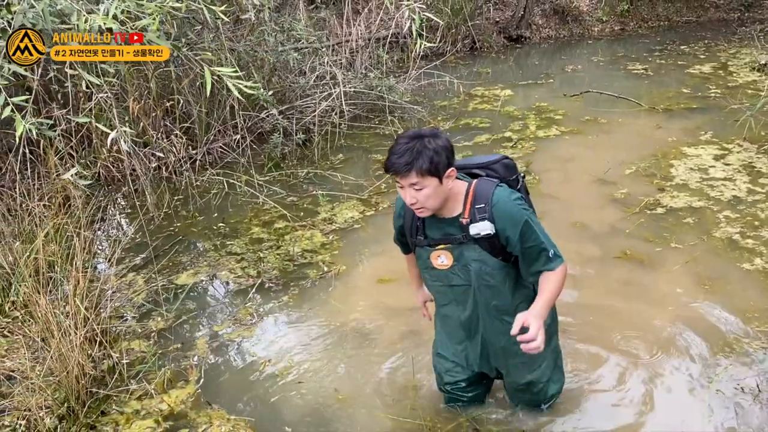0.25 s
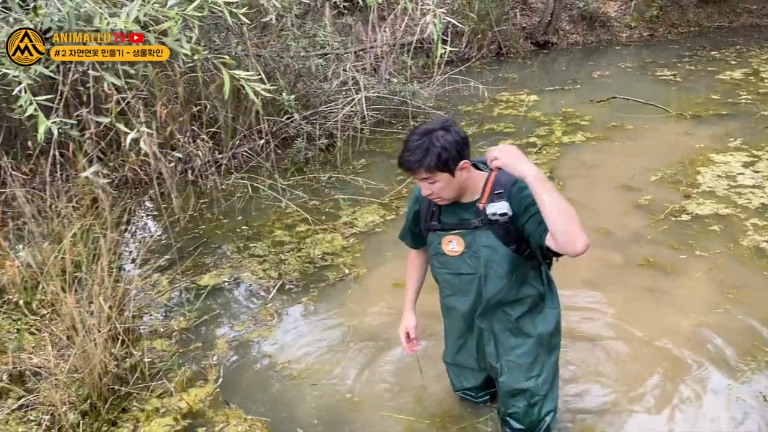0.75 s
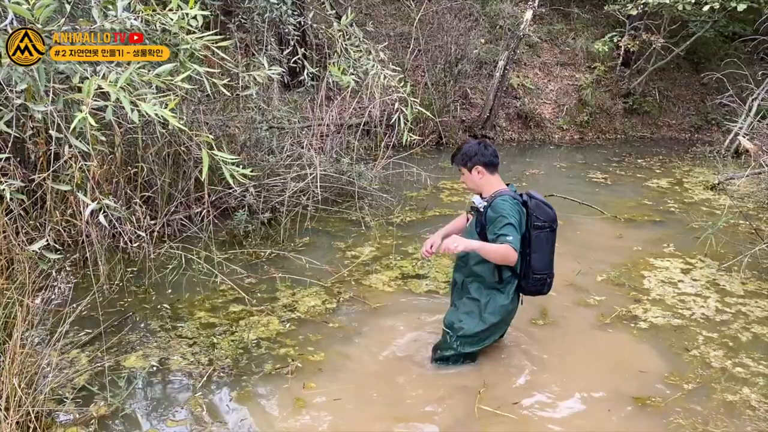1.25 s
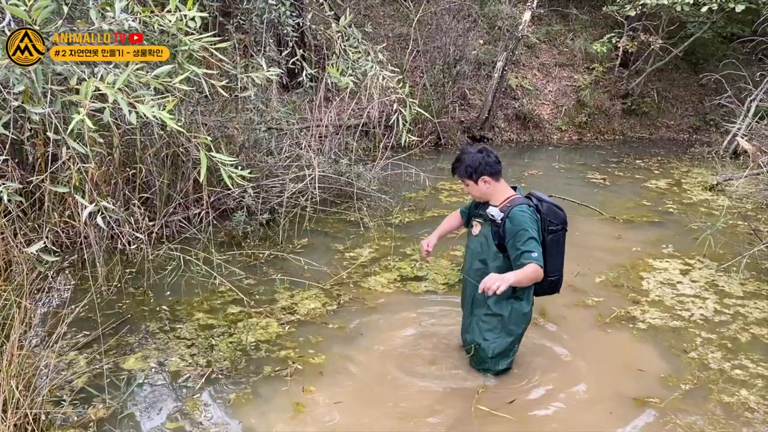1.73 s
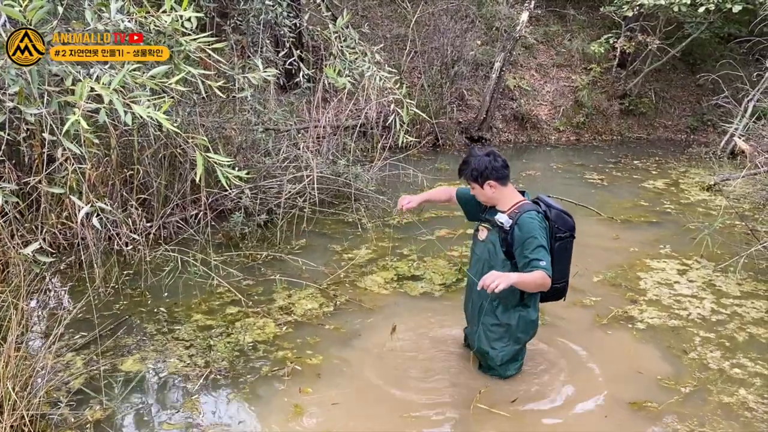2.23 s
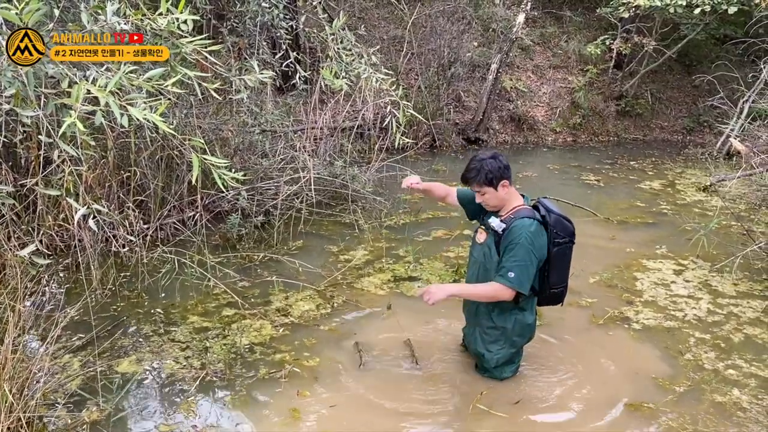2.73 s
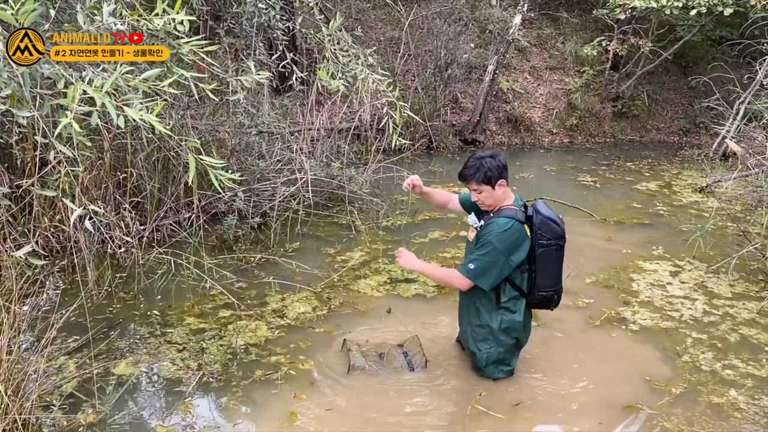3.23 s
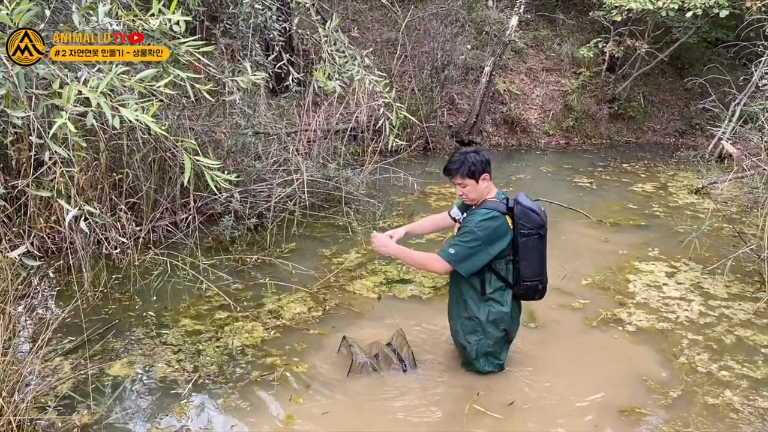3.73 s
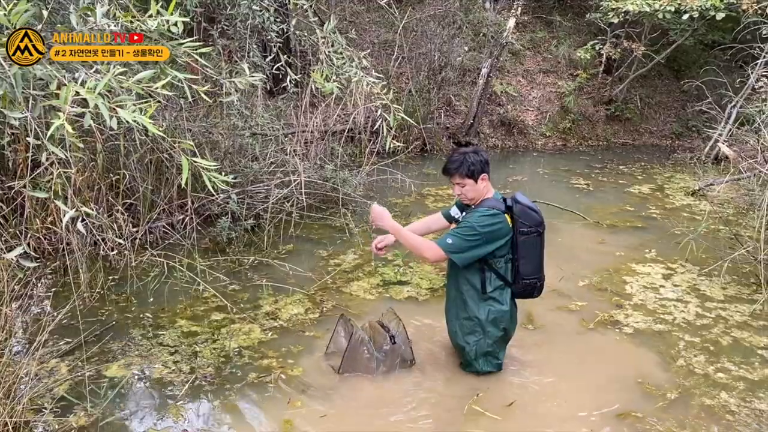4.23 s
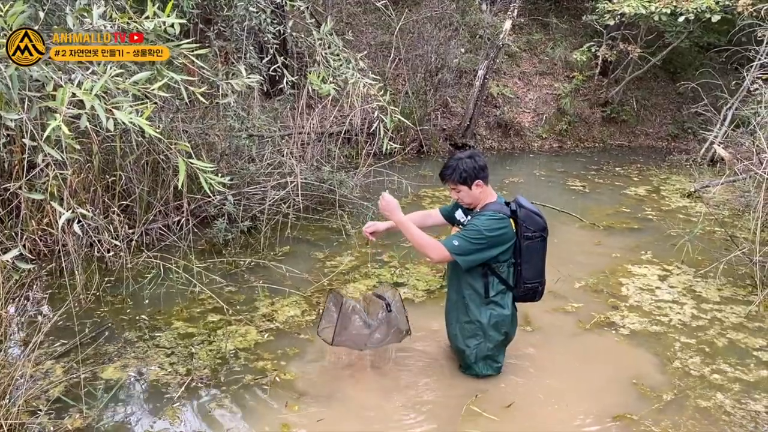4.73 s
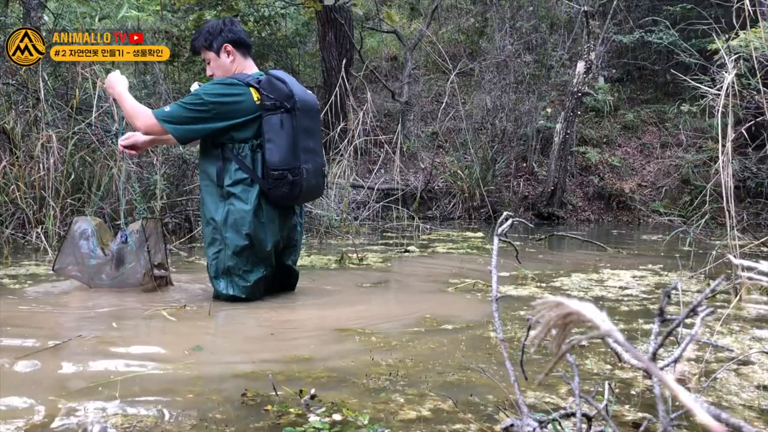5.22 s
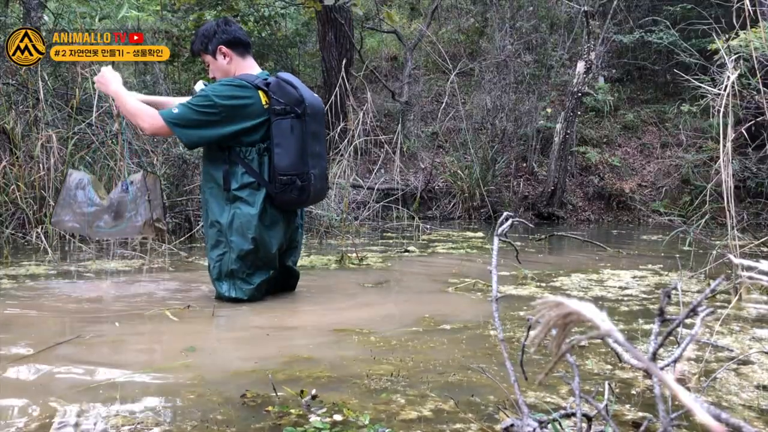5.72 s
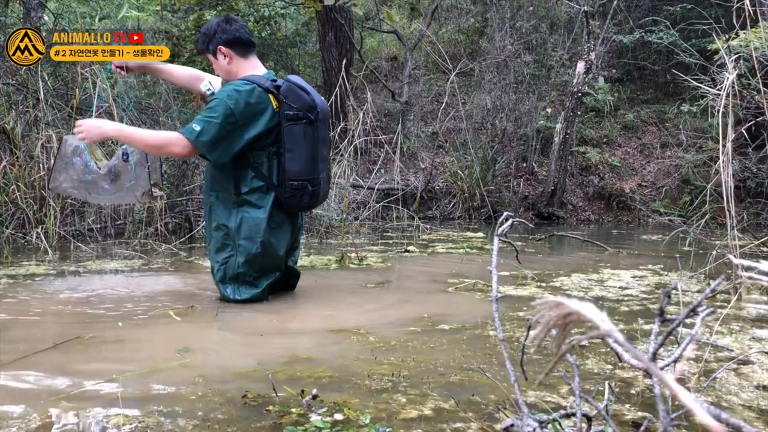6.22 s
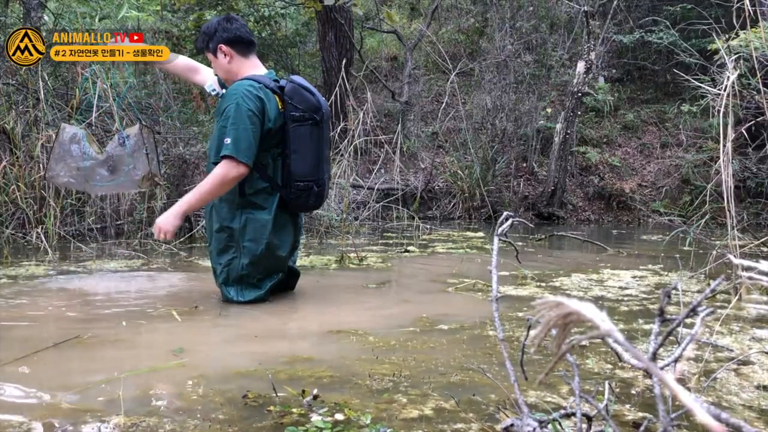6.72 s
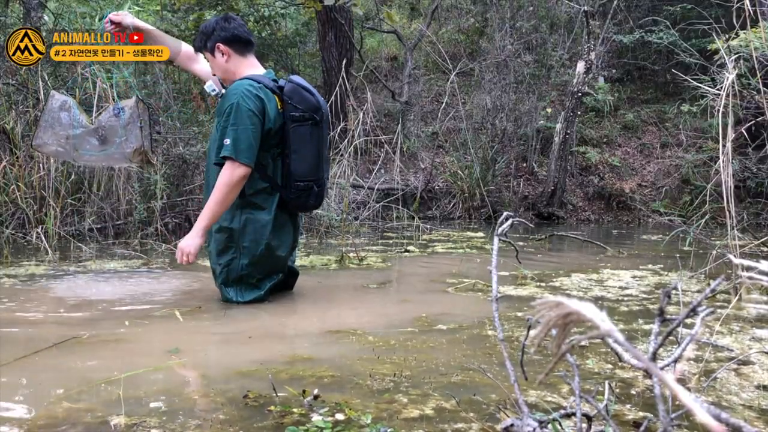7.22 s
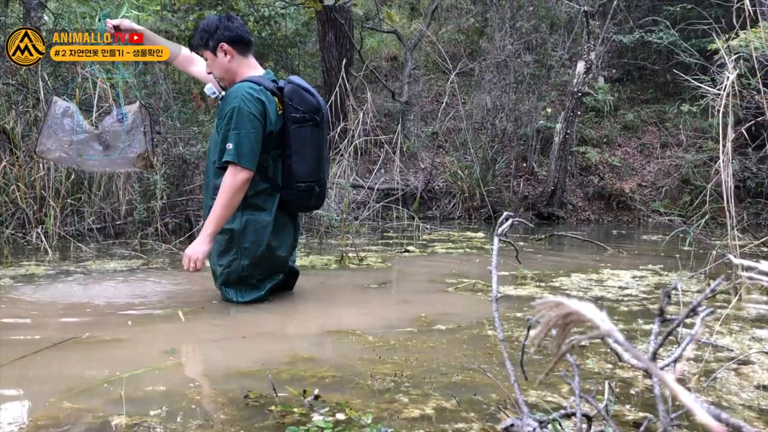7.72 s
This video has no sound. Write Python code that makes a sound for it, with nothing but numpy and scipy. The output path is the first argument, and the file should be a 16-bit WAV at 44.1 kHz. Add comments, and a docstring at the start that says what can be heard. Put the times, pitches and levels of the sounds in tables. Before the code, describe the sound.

Legs slosh through a calm pond, then a mesh trap hisses up out of the water and drains in bubbly trickles and drips while crickets trill.

```python
"""Pond water sloshes around wading legs, then a mesh trap breaks the surface with a hiss, is lifted and drains.
Moving water is lumpy noise with swarms of small bubbles; larger bubbles tick and ring, many rising in pitch.
Drops splat as short noise bursts; crickets trill and chirp on the banks as pulsed noise and tone.
A far rumble lies beneath; two ports in a small camera body hear it all with a frequency-dependent lag."""
import sys
import numpy as np
from scipy import signal
from scipy.fft import rfft, irfft, next_fast_len
from scipy.io import wavfile
from scipy.ndimage import map_coordinates

SR = 44100
rng = np.random.default_rng(int(sys.argv[2]) if len(sys.argv) > 2 else 0)


def log_audio(samples):
    """Write samples as a 16-bit WAV file to the path given in sys.argv[1]."""
    # one column per channel
    frames = np.atleast_2d(samples).T
    # limit to full scale, then quantise
    limited = np.clip(frames, -1, 1)
    pcm = np.round(limited * 32767).astype(np.int16)
    wavfile.write(sys.argv[1], SR, pcm)


N = 351036
T = np.arange(N) / SR  # s
AHEAD_UNTIL_S, WADING_UNTIL_S = 0.9, 2.5


def amp(db):
    """Gain of a level in dB."""
    return 10 ** (np.asarray(db) / 20)


def unit(x):
    """x at rms 1."""
    return x / np.sqrt(np.mean(x ** 2) + 1e-20)


def curve(rows):
    """Straight lines through (time, value) rows, one value per sample."""
    s, value = np.transpose(rows)
    return np.interp(T, s, value)


def wobble(rate):
    """A smooth random curve, rate knots a second."""
    knots = rng.standard_normal(int(N * rate / SR) + 4)
    return map_coordinates(knots, [T * rate])


def filtered(x, response):
    """x times a complex response of frequency."""
    m = next_fast_len(N + SR // 4)
    return irfft(rfft(x, m) * response(np.fft.rfftfreq(m, 1 / SR)), m)[..., :N]


def colour(points):
    """Gain read from (Hz, dB) points on a log frequency axis."""
    f, db = np.transpose(points)
    return lambda hz: amp(np.interp(np.log(hz + 1), np.log(f), db, -120, db[-1]))


def resonance(centre_hz, width_hz):
    """One causal resonance, a band-pass with gain 1 at its centre."""
    return lambda f: 1j * f * width_hz / (centre_hz ** 2 - f * f + 1j * f * width_hz)


def pair(spectrum, alike):
    """Two coloured noises of rms 1 that are partly alike, left and right."""
    turn = np.arccos(np.clip(alike, 0, 1)) / 2
    noise = filtered(rng.standard_normal((2, N)), colour(spectrum))
    shared, unlike = noise * [[np.cos(turn)], [np.sin(turn)]]
    return unit(np.array([shared + unlike, shared - unlike]))


def rings(s, hz, rise, life, db, size):
    """Bubble rings: sines that start sharply and glide up ever faster; fast risers swell before they burst."""
    s, hz, rise, life, db = (np.asarray(v, float)[:, None] for v in (s, hz, rise, life, db))
    u = np.arange(size) / SR / life  # age in lives
    octaves_up = rise * np.minimum(u, 1.2) ** 2.43
    phase = 2 * np.pi * np.cumsum(hz * 2 ** octaves_up, 1) / SR
    crest = np.clip(0.033 + 1.15 * rise, 0.05, 0.8)  # age at which the ring is loudest
    before_db = 2.5 * (1 - u / crest).clip(0)
    after_db = 8.4 * ((u - crest) / (1 - crest)).clip(0) ** 0.94 + 11 * (u - 1).clip(0)
    onset = (1 - np.exp(-u * life / 0.0007)) ** 2
    wave = amp(db - before_db - after_db) * onset * np.sin(phase)
    at = np.round(s * SR).astype(int) + np.arange(size)
    return np.bincount(at.ravel(), wave.ravel(), N + size)[:N]


def swarm(count, centre_hz, spread, cycles, rise, tail_db, size):
    """Countless small random bubbles at rms 1 overall, some louder than the rest."""
    when, big, glide, last = rng.random((count, 4)).T
    hz = np.clip(centre_hz * np.exp(spread * rng.standard_normal(count)), 320, 15000)
    db = np.minimum(-tail_db * np.log(big), 2 * tail_db)
    life = cycles * (0.26 + last) / hz
    return unit(rings(when * N / SR, hz, rise * glide, life, db, size))


def surge_db(start, crest, end, db, swell_db, sag_db):
    """Level of one push of water: a sudden start, a swell to the crest, a sag, then quick settling."""
    outside_db = 1500 * (start - T).clip(0) + 264 * (T - end).clip(0)  # slopes in dB/s
    return db - swell_db * (crest - T).clip(0) - sag_db * (T - crest).clip(0) - outside_db


def stirring():
    """Gains of slosh and seethe: calm pond, surges of pushed water and draining add up."""
    # Pushed water, from the legs and then the rising trap:
    # start/s, crest/s, end/s, slosh level at crest/dB, seethe level at crest/dB
    surges = [(0, -0.004, 0.29, -27, -32.5), (0.3, 0.472, 0.6, -42.5, -49), (0.56, 0.76, 0.88, -82, -56.5),
              (0.908, 1.252, 1.34, -52, -49.5), (1.41, 1.5, 1.494, -52, -53.5),
              (1.53, 1.784, 1.862, -44.5, -52.5), (3.572, 3.622, 4, -64, -90),
              (4.496, 4.945, 5.2, -49, -60)]
    # Water running out of the mesh: t/s, seethe level/dB
    drain = [(3.4, -82), (3.85, -69.5), (4.4, -58), (4.56, -51), (4.7, -51), (4.92, -50), (5.12, -55),
             (5.25, -48.5), (5.38, -47.5), (5.5, -47), (5.82, -50), (6, -42.5), (6.15, -47.5), (6.4, -49),
             (6.62, -52), (6.75, -53.5), (6.97, -48.5), (7.03, -54.5), (7.13, -46), (7.25, -58),
             (7.45, -53.5), (7.8, -58), (7.96, -49.5)]
    calm_db, drain_slosh_db = -70.5, -21  # lapping at rest; gurgle relative to the draining seethe
    drain_db = curve(drain)
    thinning_db = 2.5 * (T - drain[0][0]).clip(0)  # the gurgle lessens as the stream thins to drips
    slosh = amp(calm_db - thinning_db) + amp(drain_db + drain_slosh_db - thinning_db)
    seethe = amp(drain_db)
    for start, crest, end, slosh_db, seethe_db in surges:
        slosh = slosh + amp(surge_db(start, crest, end, slosh_db, swell_db=42, sag_db=72))  # dB/s
        seethe = seethe + amp(surge_db(start, crest, end, seethe_db, swell_db=5, sag_db=52))
    return slosh, seethe


def stirred():
    """Moving water traps air: gurgles below, plinks, fizz, patter and crackle above, on lumpy noise."""
    # Noise of pushed water: f/Hz, level per Hz/dB
    slosh_colour = [(120, -1), (300, 2), (700, 3.5), (1200, 4), (2500, -25)]
    # Noise of seething water: f/Hz, level per Hz/dB
    seethe_colour = [(500, -7.5), (1100, -10), (2000, -5), (4000, 2.5), (7000, -5), (11000, -4),
                     (16000, -9.5)]
    slosh, seethe = stirring()
    gurgle = swarm(count=2400, centre_hz=628, spread=0.473, cycles=9.04, rise=0.31, tail_db=3, size=1500)
    plink = swarm(count=2600, centre_hz=1300, spread=0.4, cycles=20, rise=0.5, tail_db=1.5, size=1300)
    fizz = swarm(count=7000, centre_hz=2300, spread=0.45, cycles=12, rise=0.3, tail_db=2.5, size=400)
    patter = swarm(count=500, centre_hz=3660, spread=0.508, cycles=5.3, rise=0.2, tail_db=3, size=200)
    crackle = swarm(count=4000, centre_hz=8300, spread=0.413, cycles=4.4, rise=0.044, tail_db=1.5, size=48)
    # The full stream traps many clear pockets, and its spray is brighter
    plink = plink * np.interp(T, [3.7, 4.4, 6.4, 6.8], [0.15, 1.3, 1.3, 0.45])
    crackle = crackle * np.clip(T - 3.4, 0.55, 1)
    lumps = wobble(10)  # shared by slosh and seethe
    low = amp(-8.5) * gurgle + amp(-7.5) * pair(slosh_colour, alike=0.66)
    high = amp(-8) * plink + amp(-4.5) * fizz + amp(-5) * patter + amp(-4.5) * crackle
    high = high + amp(-3.5) * pair(seethe_colour, alike=0.85)
    return slosh * amp(3.1 * lumps) * low + seethe * amp(1.5 * lumps + 3 * wobble(30)) * high


def rumble():
    """Far rumble: low coloured noise whose level drifts slowly."""
    # Rumble colour: f/Hz, level/dB
    air = [(25, -34), (40, -7.5), (60, -1.5), (110, -6.5), (250, -9.5), (420, -14), (650, -22), (1500, -28),
           (3300, -31.5)]
    # Rumble loudness: t/s, level/dB
    loudness = [(0, -58.5), (.7, -65.5), (1.2, -59.5), (3, -62), (4.7, -59.5), (5.8, -63), (6.5, -66),
                (7.7, -66), (7.85, -62)]
    return amp(curve(loudness) + 1.4 * wobble(4.1)) * pair(air, alike=0.7)


def strokes(rate, sharp):
    """Wing strokes: a gate that opens about rate times a second, slightly unsteady."""
    phase = 2 * np.pi * np.cumsum(rate + 0.36 * wobble(1.85)) / SR
    return (0.5 + 0.5 * np.sin(phase)) ** sharp


def singer(gate, centre_hz, width_hz, blur):
    """Gated noise, as of file teeth, shakes a wing resonance; leaves scatter it unlike to each port."""
    noise = rng.standard_normal(N) + blur * rng.standard_normal((2, N))
    wing = resonance(centre_hz, width_hz)
    return unit(filtered(noise * gate, lambda f: wing(f) ** 2))


def sung(start, end):
    """A gate with soft edges."""
    edge_s = 0.032
    return np.clip(np.minimum(T - start, end - T) / edge_s + 0.5, 0, 1)


def far_chorus():
    """Far insects blend into steady coloured noise that wavers a little."""
    # Blend of many far singers: f/Hz, level/dB
    chorus = [(3300, -27), (4100, -16), (5300, -2), (7500, -6.5), (8400, -3), (9300, -17), (11000, -22),
              (11900, -40), (12800, -7), (14700, -10), (15600, -53)]
    return amp(-58 + 1.2 * wobble(3) + 0.8 * wobble(12)) * pair(chorus, alike=0.7)


def thin_trill():
    """An unbroken narrow trill of wing strokes through a sharp resonance."""
    gate = 0.3 + strokes(32.5, sharp=1.5)
    return amp(-68 + 1.5 * wobble(5)) * singer(gate, 5970, 130, blur=0.8)


def low_trill():
    """The low singer: bouts of even bursts over a constant murmur, stroked at two rates an octave apart."""
    # Bouts: first burst t/s, number of bursts, level/dB
    bouts = [(2.41, 4, -59), (4.54, 3, -58), (6.85, 3, -56.5)]
    every_s, burst_s, murmur_db = 0.33, 0.15, -63
    gain = amp(murmur_db)
    for first, count, db in bouts:
        for k in range(round(count)):
            start = first + k * every_s
            gain = gain + amp(db) * sung(start, start + burst_s)
    gate = 0.5 + strokes(64.8, sharp=1.2) * (1.2 + strokes(32.4, sharp=1.2))
    return gain * singer(gate, 4330, 480, blur=1.3)


def high_trill():
    """The high singer: fast strokes in long phrases that grow louder toward their ends."""
    # Phrases: start/s, end/s, final level/dB
    phrases = [(1.05, 2.41, -58.5), (2.95, 3.306, -60.5), (3.575, 4.167, -60.5), (4.8, 6.296, -63),
               (6.4, 7.96, -55.5)]
    grows_db = 3
    gain = 0
    for start, end, db in phrases:
        remaining = np.clip((end - T) / (end - start), 0, 1)
        gain = gain + amp(db - grows_db * remaining ** 2) * sung(start, end)
    return gain * singer(0.2 + strokes(81.8, sharp=2.5), 6520, 620, blur=1.3)


def chirper():
    """One cricket calls in chirps of about four strokes, a wavering tone mixed with wing noise."""
    # Chirps: t/s, level/dB
    chirp_times = [(1.788, -47.5), (1.965, -47.5), (2.129, -49), (2.304, -48.5), (2.488, -47.5),
                   (2.675, -51), (3.02, -55), (3.15, -51), (4.073, -53), (4.249, -53), (4.426, -53),
                   (4.6, -52), (4.78, -53), (4.955, -53)]
    calls, t = np.zeros(N + SR), np.arange(SR // 12) / SR
    pulses = 0.15 + np.sin(np.pi * 60 * t) ** 2  # 60 strokes a second
    arch = np.sin(np.pi * (t / 0.068).clip(0, 1)) ** 0.6
    for s, db in chirp_times:
        calls[round(s * SR):][:len(t)] += amp(db) * pulses * arch
    tone = np.sin(2 * np.pi * np.cumsum(5100 + 40 * wobble(8)) / SR)
    return calls[:N] * (amp(-1) * tone + amp(-5) * singer(1, 4900, 600, blur=0.8))


def crickets():
    """A far chorus and a thin trill around; two trills and the chirper louder on the left."""
    left_right = amp([[1.5], [-1.5]])
    return far_chorus() + thin_trill() + (low_trill() + high_trill() + chirper()) * left_right


def bubbles():
    """Each pocket of air is born with a wet tick and rings, often upward as it nears the surface."""
    # Trapped air that stands out: t/s, start pitch f/Hz, pitch rise/octaves, life/s, level/dB
    pockets = [(0.02, 313.5, 0.29, 0.021, -22), (0.05, 660, 0.058, 0.0063, -27),
               (0.068, 1180, 0.0099, 0.0065, -26.5), (0.074, 3420, 0.066, 0.0028, -20),
               (0.084, 957, 0.58, 0.017, -36), (0.098, 1655, 0.59, 0.012, -34),
               (0.105, 517, 0.05, .006, -32), (0.124, 1285, 0.21, 0.009, -31),
               (0.16, 530, 0.21, 0.014, -31), (0.175, 560, 0.051, 0.0063, -24.5),
               (0.182, 2270, 0.05, 0.0052, -39), (0.214, 1490, 0.067, 0.0056, -30.5),
               (0.259, 1960, 0.16, 0.0098, -33), (0.299, 330, 0.39, 0.0087, -41.5),
               (0.318, 810, 0, 0.0054, -38), (0.365, 1130, 0.05, 0.014, -34),
               (0.399, 1076, 0.05, 0.012, -33), (0.417, 440, 0.53, 0.0023, -29),
               (0.439, 1360, 0.18, 0.0041, -26), (0.438, 1900, 0.12, 0.0023, -22),
               (0.449, 552, 0.18, 0.063, -46), (0.572, 170, 0, 0.008, -46), (0.611, 600, 0.1, 0.004, -47),
               (0.616, 160, 0, 0.01, -45), (0.912, 830, 0.013, 0.0038, -37.5),
               (0.99, 700, 0.36, 0.0095, -43.5), (1.074, 874, 0.38, 0.01, -32.5),
               (1.104, 720, .6, 0.034, -39.5), (1.106, 1910, 0.27, 0.0072, -22),
               (1.123, 1440, 0.16, 0.0062, -34), (1.137, 2870, 0.2, 0.0046, -35),
               (1.152, 1980, 0.18, .008, -37), (1.154, 906, 0.55, 0.048, -40),
               (1.196, 1645, 0.35, 0.011, -29.5), (1.212, 780, 0.1, 0.02, -43),
               (1.245, 2490, 0.05, 0.0031, -33), (1.263, 1780, 0.11, 0.0071, -31.5),
               (1.31, 1660, 0, 0.0028, -37), (1.472, 1660, .011, 0.0028, -24),
               (1.487, 2770, 0.27, .005, -37), (1.499, 2200, 0.05, .004, -34),
               (1.549, 1880, 0.12, 0.0028, -27), (1.585, 590, 1.6, 0.018, -43),
               (1.611, 1510, 0.39, 0.018, -42.5), (1.631, 1050, 0.29, 0.0093, -43),
               (1.682, 1635, 0.34, 0.02, -41), (1.722, 884, 0.17, 0.024, -33.5),
               (1.742, 556, 0.16, 0.013, -34.5), (1.756, 1500, 0.11, 0.01, -33.5),
               (1.793, 1070, .01, 0.0097, -42), (1.799, 474, 0, 0.0057, -29.5),
               (1.818, 1090, 0, 0.0094, -40.5), (2.645, 794, 0.15, 0.0035, -44.5),
               (2.86, 430, 0.05, 0.03, -56), (3.561, 408, 0.081, 0.15, -59.5),
               (3.828, 1364, 0.12, 0.0069, -42), (3.943, 1720, .041, 0.012, -48.5),
               (4.148, 1800, 0.049, 0.013, -45.5), (4.194, 740, 0.69, .053, -52),
               (4.244, 1645, 0.31, 0.018, -48.5), (4.333, 1330, 0.1, 0.011, -44.5),
               (4.334, 1900, 0.12, 0.011, -45), (4.418, 1000, 0.25, 0.016, -40),
               (4.493, 2460, 0.11, 0.0044, -33.5), (4.537, 842, 0.13, 0.026, -35),
               (4.564, 2620, 0.061, 0.0065, -29.5), (4.611, 1040, 0, 0.016, -41),
               (4.633, 1750, 0, 0.0082, -34), (4.728, 800, 0.1, 0.026, -46),
               (4.733, 1940, 0.41, 0.016, -44), (4.752, 850, 0.11, 0.072, -43.5),
               (4.774, 1786, 0.12, 0.0079, -33.5), (4.793, 990, 0.15, 0.015, -32.5),
               (4.809, 792, 0.38, 0.032, -38.5), (4.852, 604, 0.032, 0.028, -36.5),
               (4.865, 1630, 0.026, 0.0091, -35), (4.892, 595, .12, 0.05, -36),
               (4.914, 2480, 0.05, 0.011, -39.5), (4.932, 1330, 0.03, 0.0098, -34),
               (4.941, 1575, 1.4, 0.015, -39.5), (4.964, 722, 0.49, 0.027, -32),
               (4.985, 3500, 0.38, 0.0032, -18), (5.036, 960, 0.043, 0.0033, -25.5),
               (5.05, 2380, 0, 0.0026, -22), (5.061, 1130, 0.12, 0.04, -46), (5.112, 1100, 0, 0.07, -50),
               (5.063, 812, 0.095, 0.043, -46.5), (5.15, 2720, 0.16, 0.0044, -22.5),
               (5.214, 1050, 0.2, 0.0075, -36), (5.253, 917, 0.093, 0.031, -32.5),
               (5.287, 1810, 0.22, 0.0042, -26.5), (5.312, 1550, 0, 0.013, -36),
               (5.329, 986, 0.075, 0.011, -32), (5.345, 825, 0.93, 0.029, -35), (5.39, 890, 0, 0.019, -40),
               (5.393, 1850, 0.61, 0.008, -34), (5.4, 1410, 0.56, .005, -32), (5.42, 1020, 0, 0.018, -36.5),
               (5.434, 1660, 0.1, .008, -38), (5.445, 783, .079, 0.0089, -31.5), (5.5, 800, 0, 0.02, -44),
               (5.537, 786, 0.58, 0.016, -40), (5.559, 1320, 2.1, 0.016, -35.5),
               (5.599, 1260, 0.26, 0.0041, -29), (5.621, 1230, 0.75, 0.032, -36.5),
               (5.697, 1570, 0.38, 0.0032, -25), (5.7, 590, 2.1, 0.088, -46.5),
               (5.74, 1440, 0.17, 0.0065, -28.5), (5.819, 960, 0.4, 0.029, -38.5),
               (5.845, 2300, 0.24, 0.0053, -34), (5.925, 984, 0.31, 0.026, -38.5),
               (5.932, 2760, 0.05, 0.0037, -28), (5.94, 769, 1, 0.037, -31.5),
               (5.963, 1900, 0.21, .012, -39), (5.973, 813, 0, 0.059, -42.5),
               (5.975, 1526, 0.93, 0.015, -34), (5.998, 1720, 0.4, .006, -35),
               (6.021, 1710, 1.6, 0.032, -38.5), (6.042, 689, 1.24, 0.036, -33),
               (6.068, 687, 0.5, 0.025, -40), (6.077, 1530, 0.6, 0.011, -30),
               (6.098, 1180, 0.18, 0.0062, -33), (6.147, 632, 0.85, 0.028, -35.5),
               (6.155, 1140, 0, 0.01, -34), (6.166, 920, 0.017, 0.024, -31),
               (6.211, 3330, 0.26, 0.0045, -29.5), (6.214, 859, 0.3, 0.024, -28.5),
               (6.258, 880, 1.2, 0.0074, -37), (6.279, 3080, 0.53, 0.0055, -26),
               (6.318, 768, 0, 0.037, -48.5), (6.377, 616, 0.95, 0.032, -39),
               (6.393, 3810, 0.36, .004, -25.5), (6.41, 992, 2, 0.039, -45.5),
               (6.444, 1000, .8, 0.031, -44), (6.521, 1030, 0.15, 0.0033, -32),
               (6.543, 1520, 0.05, 0.016, -45), (6.603, 3280, 0.081, .012, -39),
               (6.631, 4000, 0.3, 0.0045, -28.5), (6.682, 1660, 0.21, 0.0027, -30),
               (6.701, 1504, 1.1, 0.018, -37.5), (6.764, 1600, 0.9, 0.0066, -27),
               (6.816, 1410, 0.32, 0.015, -35.5), (6.845, 2200, 0.33, .008, -41),
               (6.87, 1720, 0.05, .007, -35), (6.877, 880, 0.44, 0.019, -42.5),
               (6.909, 1840, 0.02, 0.0081, -40), (6.926, 1043, 0.97, 0.011, -36.5),
               (6.979, 964, 1.9, 0.01, -41), (6.974, 895, 0, .012, -39), (7.092, 1970, 0.08, 0.0061, -36),
               (7.094, 3480, .45, 0.0041, -29.5), (7.115, 1760, 0, 0.0031, -23),
               (7.117, 2050, 0.57, .0097, -33), (7.117, 506, 0.4, 0.065, -43.5),
               (7.16, 1680, .4, .013, -37.5), (7.164, 1175, 0.076, 0.013, -39),
               (7.198, 820, 1.2, 0.018, -49.5), (7.237, 1066, 0, 0.028, -46),
               (7.268, 2030, 0.12, 0.0082, -44.5), (7.321, 1480, 0.42, 0.0069, -42),
               (7.35, 2850, 0.079, .005, -38), (7.394, 810, 0.1, 0.018, -52),
               (7.401, 1620, 0.27, 0.0082, -40), (7.428, 700, 0.7, 0.016, -55),
               (7.443, 1760, 0.022, 0.0068, -35.5), (7.462, 1170, 0.3, 0.003, -33),
               (7.52, 1150, 0, 0.02, -45), (7.554, 800, 0.9, 0.06, -47), (7.557, 2040, 0.7, 0.0056, -39),
               (7.655, 2670, 0.11, 0.0043, -35), (7.697, 800, 0.8, 0.044, -42.5),
               (7.711, 1600, 0.34, 0.016, -41), (7.733, 3150, 0.0049, 0.0037, -31),
               (7.751, 960, 0.21, 0.028, -39.5), (7.786, 3070, 0.12, 0.0044, -37),
               (7.799, 1530, 0.47, .02, -45.5), (7.796, 996, 0, 0.019, -41.5),
               (7.812, 790, 1.1, 0.033, -44), (7.87, 1470, 0.64, 0.019, -43.5),
               (7.89, 2760, 0, 0.0018, -21.5), (7.916, 830, 0.1, .02, -54), (7.933, 1980, 0.24, .006, -37),
               (7.948, 2800, .036, 0.0024, -19)]
    s, hz, rise, life, db = np.transpose(pockets)
    t = np.arange(SR // 100) / SR
    puffs = amp(db[:, None] - 4.5 - 60 * t / 0.021) * rng.standard_normal((len(s), len(t)))
    at = np.round(s * SR).astype(int)[:, None] + np.arange(len(t))
    ticks = np.bincount(at.ravel(), puffs.ravel(), N + SR)[:N]
    churn_db = np.where(T < WADING_UNTIL_S, 2.6, 1.6)  # wading churns the surface more
    flutter = amp(1.1 * wobble(70) + churn_db * wobble(350))  # ripples overhead shake the loudness
    return flutter * rings(s, hz, rise, life, db, size=5000) + filtered(ticks, resonance(3300, 1800))


def splats():
    """A drop or slap hits with a bright crack and a lower body, noise bursts that die fast."""
    # Hits on the surface: t/s, crack level/dB, body level relative to the crack/dB
    hits = [(0.07, -22.5, -3), (0.1396, -34, 0), (0.1735, -44, -10), (0.212, -25.5, -14), (0.327, -28, -14),
            (0.378, -28, -8), (0.4277, -20, -11), (0.4397, -25.5, -12), (1.331, -29, -24),
            (1.598, -41.5, 6.5), (4.6643, -29, -9), (4.7057, -29, -8), (4.9642, -34, -1),
            (4.9846, -18, -23), (5.248, -18, -21), (5.294, -24, -28), (5.44, -26.5, -12), (5.7239, -21, -8),
            (5.7778, -24, -15), (5.8696, -26, -8), (5.899, -36, 2.5), (6.0674, -35, -1), (6.1358, -21, -14),
            (6.26, -28.5, -3.5), (6.3934, -24.5, -16), (6.43, -33, 2), (6.7006, -35.5, 4),
            (6.7448, -14, -16.5), (6.813, -34, 3), (6.869, -30, -12), (6.911, -29, -0.5),
            (6.9752, -24.5, -12), (6.9975, -23, -12), (7.062, -30, -16), (7.0802, -23.5, -9.5),
            (7.1563, -37.5, 6), (7.267, -28, -16), (7.2884, -24.5, -13), (7.3502, -31, -4),
            (7.444, -33, 3.5), (7.5366, -24.5, -16), (7.824, -23, -28)]
    bright, body, t = np.zeros(N + SR), np.zeros(N + SR), np.arange(SR // 20) / SR
    decay = amp(-60 * t / 0.009) + 0.2 * amp(-60 * t / 0.065)  # a hit, then weaker spray
    shape = decay * (1 - np.exp(-t / 0.0006))
    for s, db, body_db in hits:
        burst = shape * rng.standard_normal((2, len(t)))
        bright[round(s * SR):][:len(t)] += amp(db - 4.5) * burst[0]
        body[round(s * SR):][:len(t)] += amp(db + body_db + 11) * burst[1]
    crack = resonance(10800, 7500)
    return filtered(bright[:N], lambda f: crack(f) ** 2) + filtered(body[:N], resonance(4430, 1800))


def banks(x):
    """A short weak answer from reeds and banks: decaying noise tails, unlike on each side."""
    t = np.arange(SR // 6) / SR
    tail = rng.standard_normal((2, len(t))) * amp(-60 * t / 0.1) * (t > 0.002)
    return signal.fftconvolve(x[None], tail / np.linalg.norm(tail[0]), axes=1)[:, :N]


def wash():
    """A smooth hiss as the mesh breaks the surface: noise swells, creeps up and fades out."""
    # Hiss colour: f/Hz, level per Hz/dB
    mesh = [(400, -19), (900, -4), (1300, -10), (2000, -1), (3500, -4), (4950, 6.5), (5500, 3.5),
            (7000, -7), (9000, -7), (16000, -25)]
    start_s, attack_s, hold_s, release_s = 2.528, 0.29, 0.42, 0.29
    top_db, creep_db, floor_db = -49, 5.5, -79
    s = np.cumsum([start_s, attack_s, hold_s, release_s])
    level_db = np.interp(T, s, [floor_db, top_db - creep_db, top_db, floor_db])
    return amp(level_db + 0.91 * wobble(4.76)) * pair(mesh, alike=0.75)


def aside(x, share, shade):
    """The camera body delays and shades a source that is not straight ahead."""
    # Full sideways effect, scaled by share and shade: f/Hz, left lead/rad, left-right level/dB
    sideways = [(0, 0, -2), (1500, .3, -4), (3600, 2.2, 0), (5500, 2.8, 3), (6700, 0, 0)]
    f, lead, db = np.transpose(sideways)
    side = np.array([[0.5], [-0.5]])

    def response(hz):
        turn = np.exp(1j * side * share * np.interp(hz, f, lead))
        return turn * amp(side * shade * np.interp(hz, f, db))
    return filtered(x, response)


def scene():
    """Legs stir water nearly ahead, then a little aside; the trap drains further aside; insects all round."""
    drops = bubbles() + splats()
    water = drops + stirred() + wash()
    water = filtered(water, lambda hz: (1j * hz / (70 + 1j * hz)) ** 2)  # splashes radiate no deep bass
    ahead, draining = T < AHEAD_UNTIL_S, T > WADING_UNTIL_S
    near = aside(water * ahead, share=0.33, shade=0.05)
    near = near + aside(water * (~ahead & ~draining), share=0.54, shade=1.23)
    near = near + aside(water * draining, share=0.67, shade=1.0)
    return near + amp(-7.5) * banks(drops) + crickets() + rumble()


def record(dry):
    """In the treble the ports drift apart in phase; nothing is kept above the band limit."""
    # Phase between the ports: f/Hz, left lead/half turns
    port_lead = [(6700, 0), (8400, -1), (10100, -2), (12000, -3), (14100, -4), (15700, -5)]
    top_hz = 16000
    f, lead = np.transpose(port_lead)
    half = np.array([[0.5], [-0.5]])  # each port takes half the lead
    return filtered(dry, lambda hz: (hz < top_hz) * np.exp(1j * np.pi * half * np.interp(hz, f, lead)))


dry = scene()
out = record(dry)
log_audio(out)
```